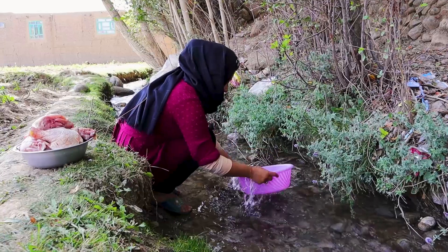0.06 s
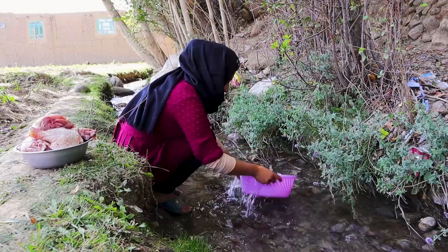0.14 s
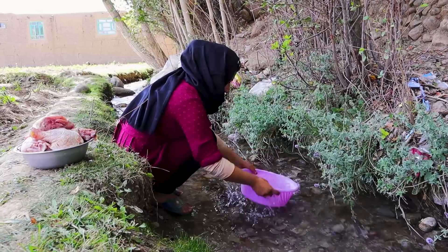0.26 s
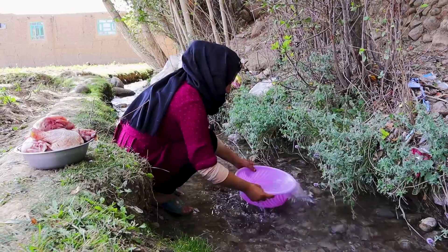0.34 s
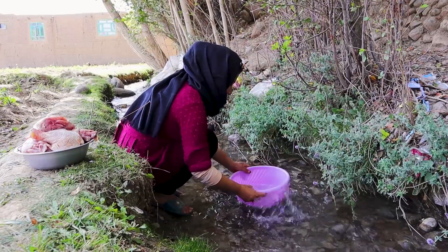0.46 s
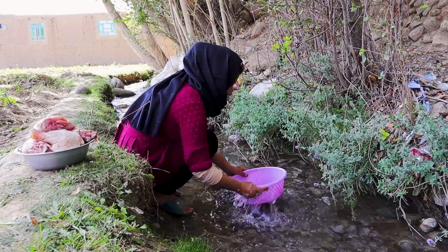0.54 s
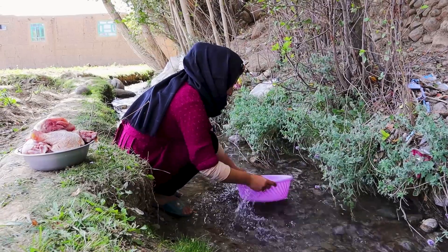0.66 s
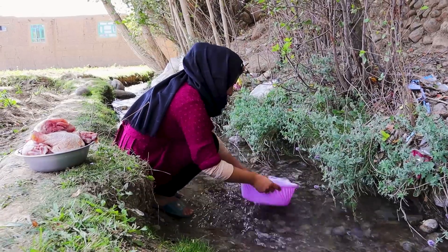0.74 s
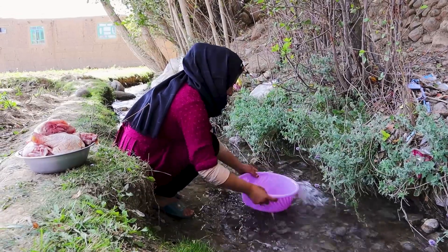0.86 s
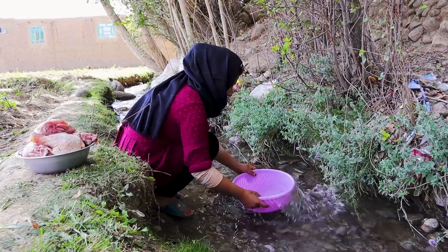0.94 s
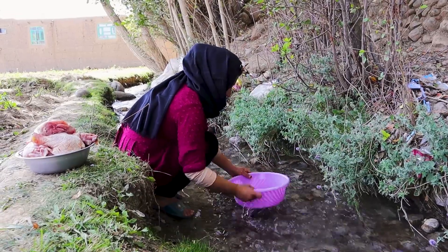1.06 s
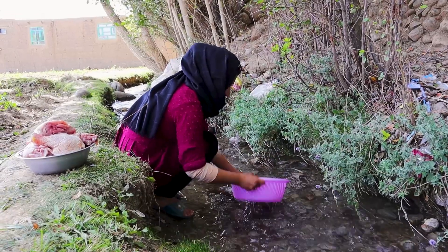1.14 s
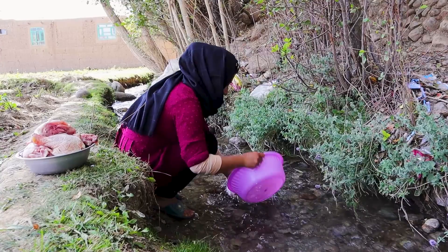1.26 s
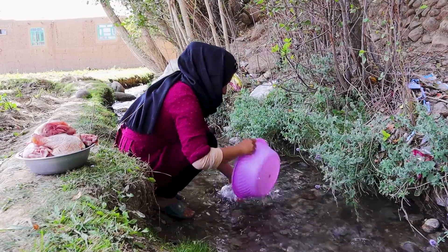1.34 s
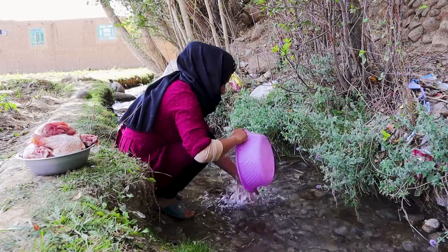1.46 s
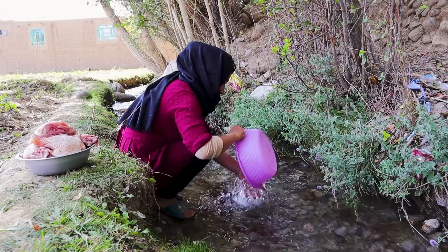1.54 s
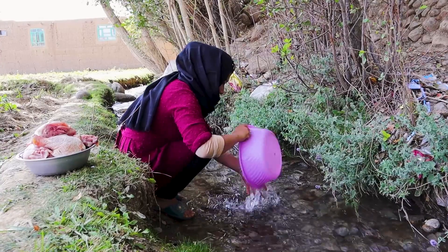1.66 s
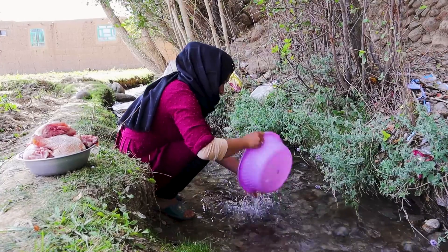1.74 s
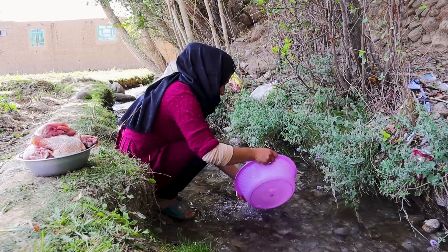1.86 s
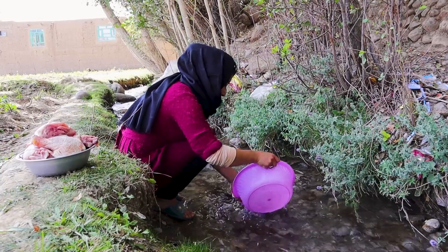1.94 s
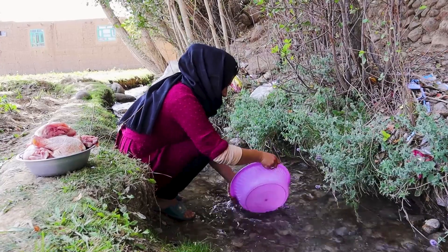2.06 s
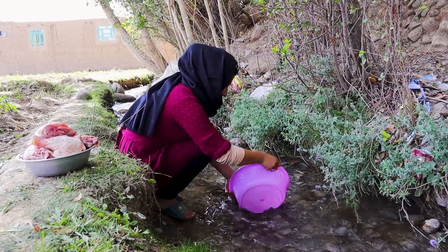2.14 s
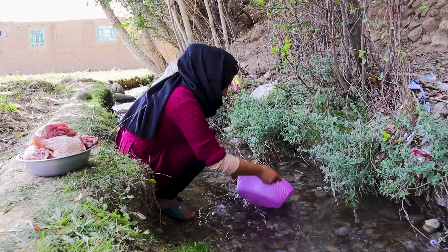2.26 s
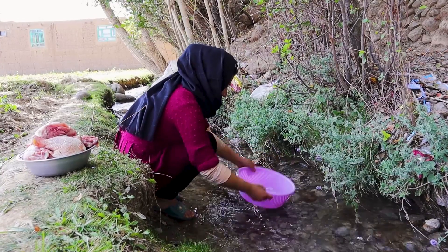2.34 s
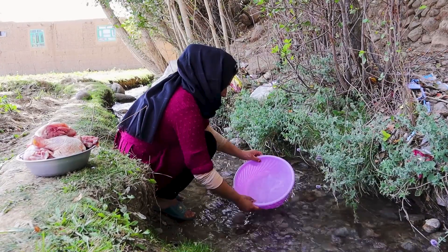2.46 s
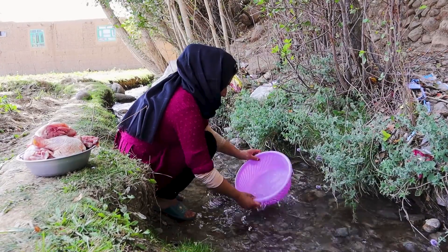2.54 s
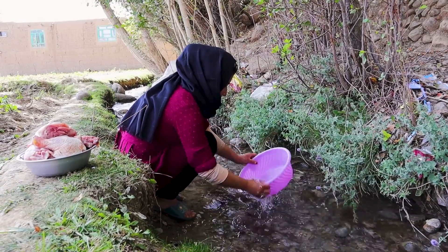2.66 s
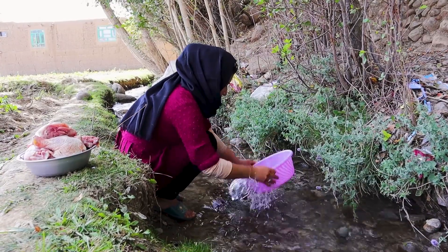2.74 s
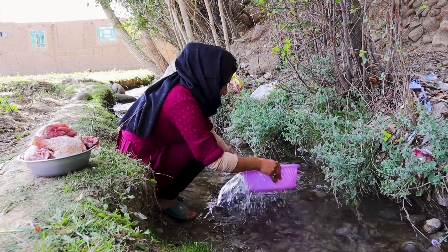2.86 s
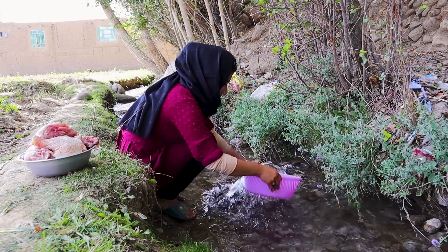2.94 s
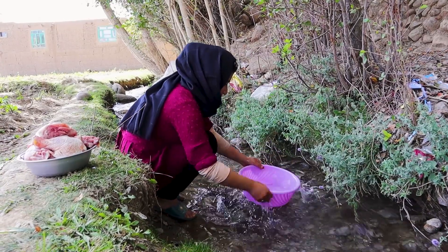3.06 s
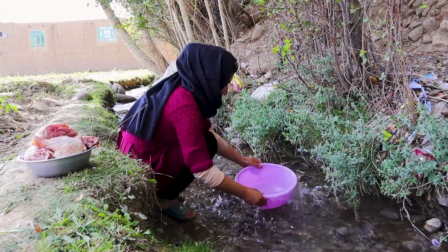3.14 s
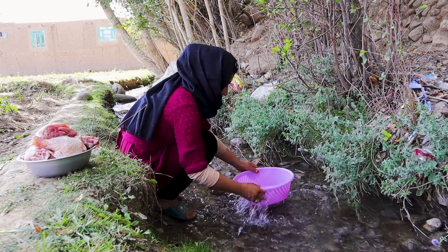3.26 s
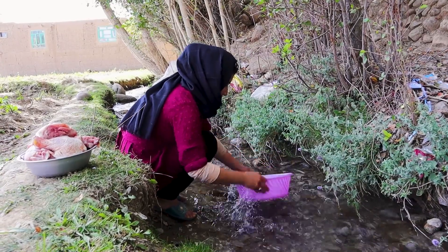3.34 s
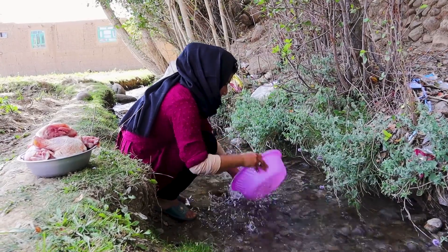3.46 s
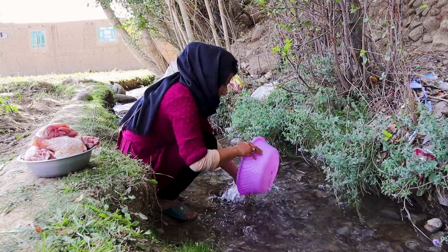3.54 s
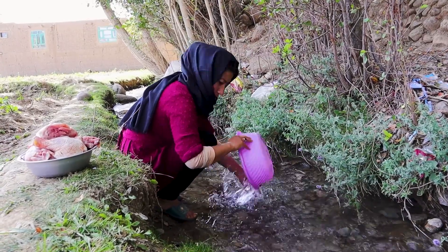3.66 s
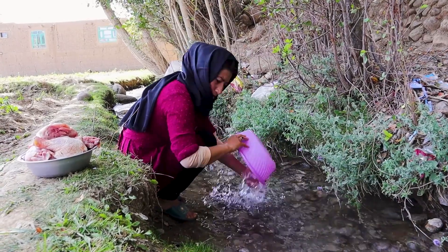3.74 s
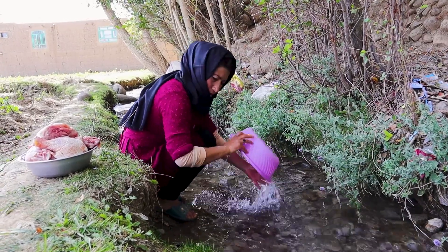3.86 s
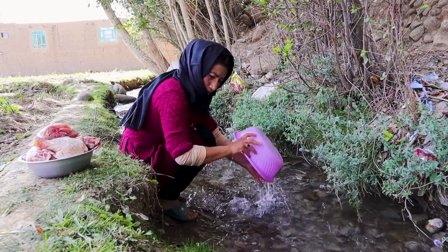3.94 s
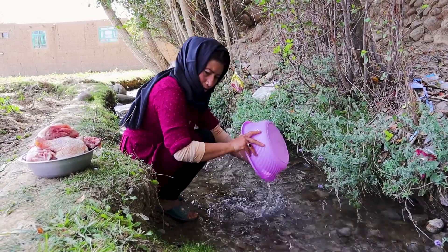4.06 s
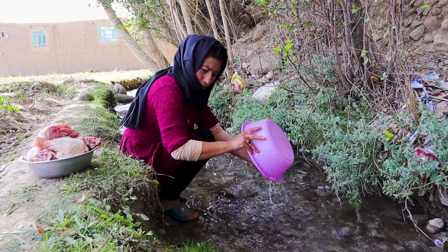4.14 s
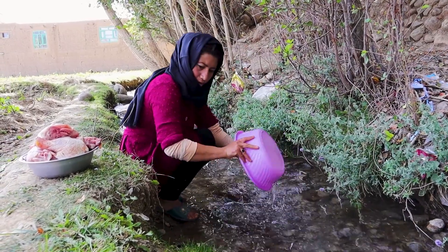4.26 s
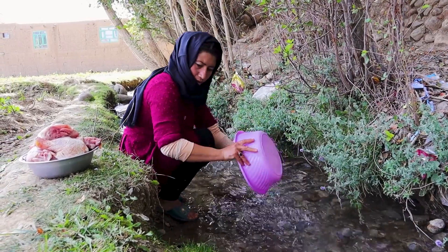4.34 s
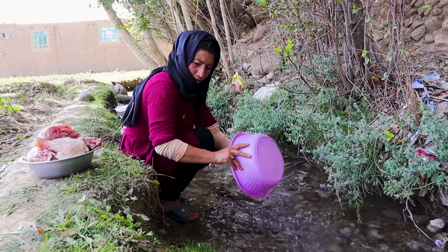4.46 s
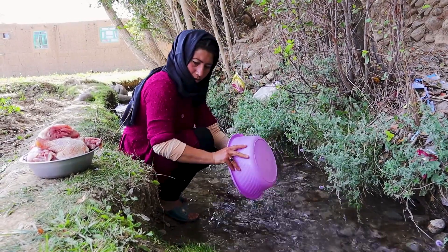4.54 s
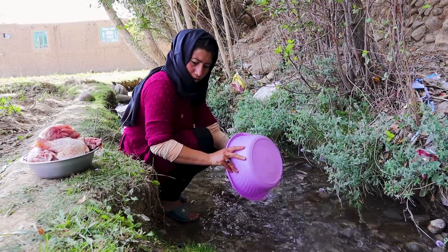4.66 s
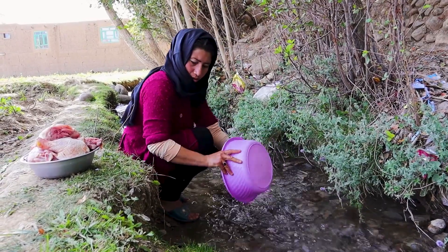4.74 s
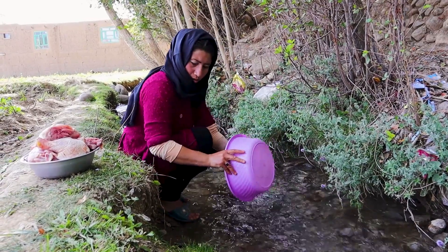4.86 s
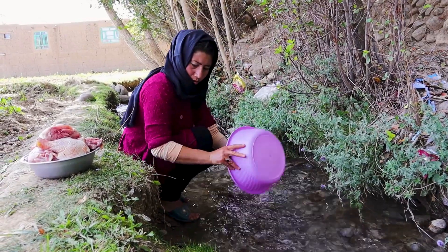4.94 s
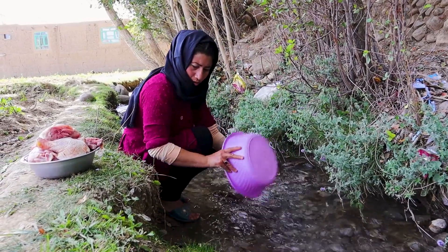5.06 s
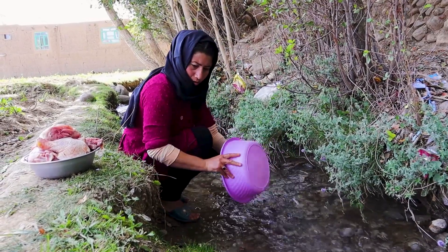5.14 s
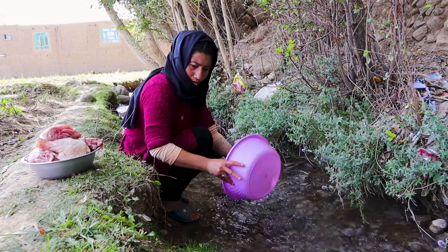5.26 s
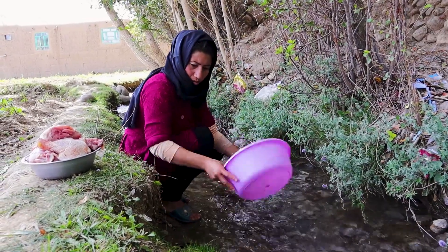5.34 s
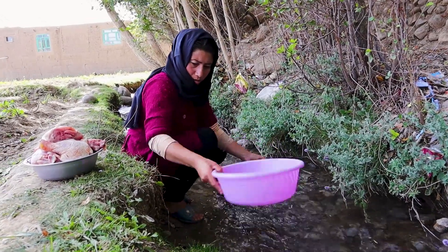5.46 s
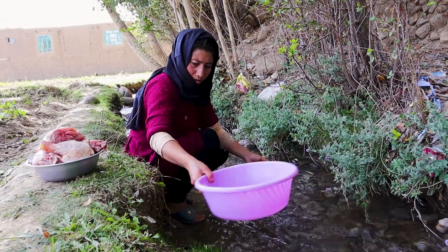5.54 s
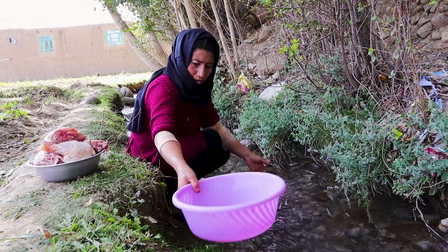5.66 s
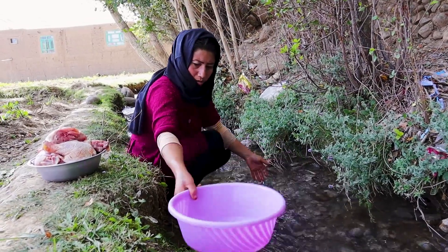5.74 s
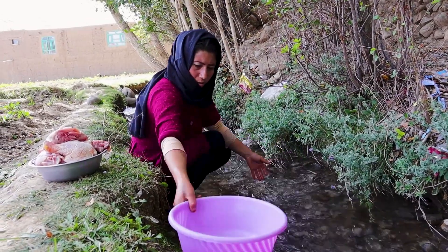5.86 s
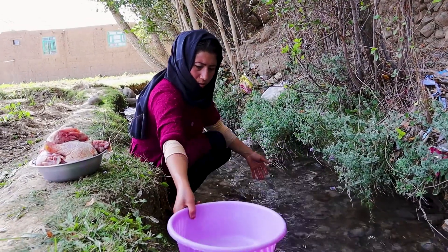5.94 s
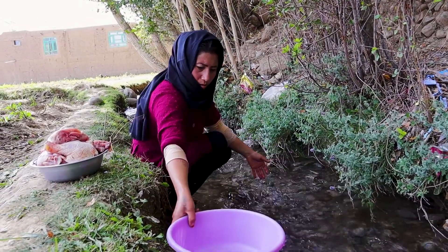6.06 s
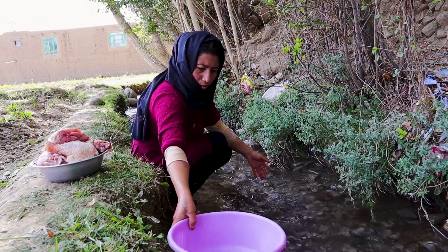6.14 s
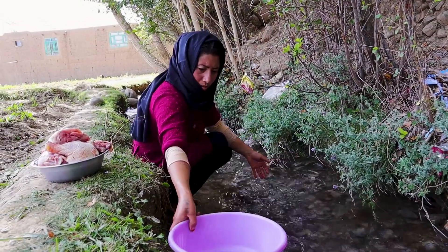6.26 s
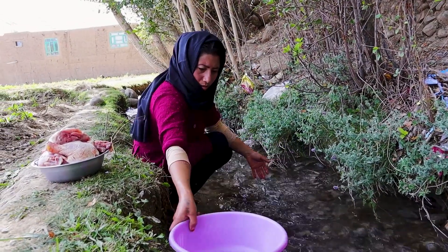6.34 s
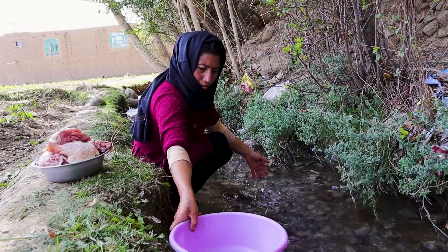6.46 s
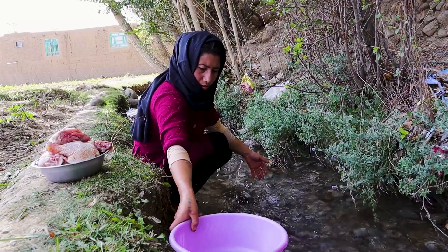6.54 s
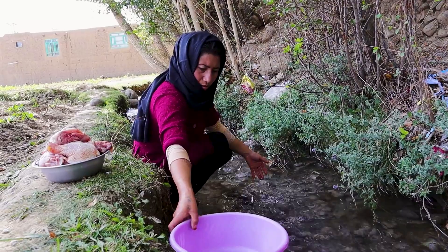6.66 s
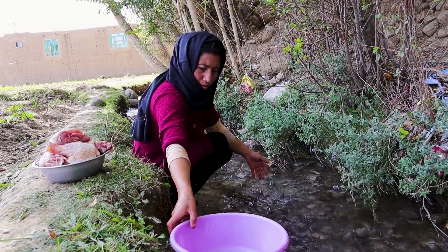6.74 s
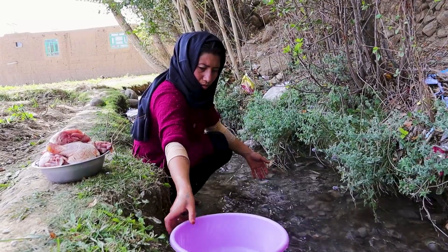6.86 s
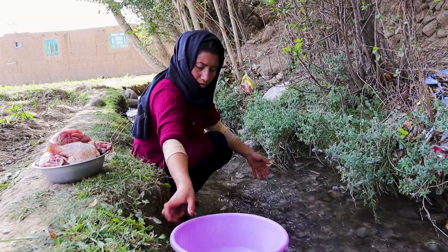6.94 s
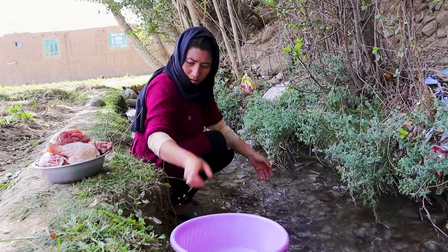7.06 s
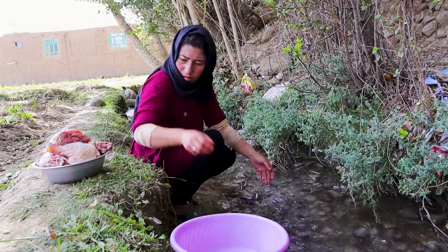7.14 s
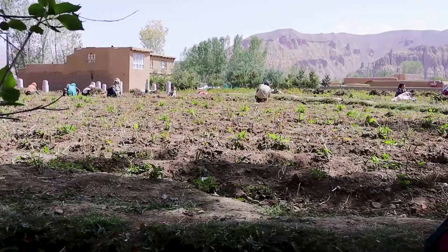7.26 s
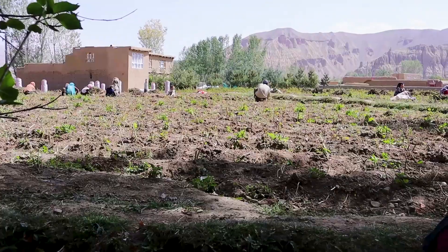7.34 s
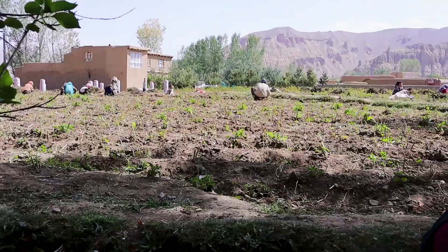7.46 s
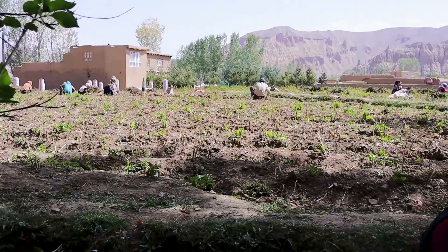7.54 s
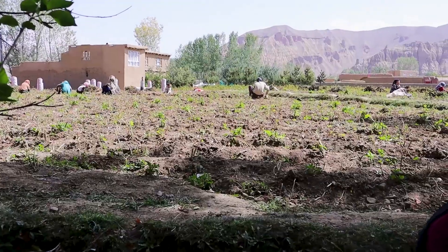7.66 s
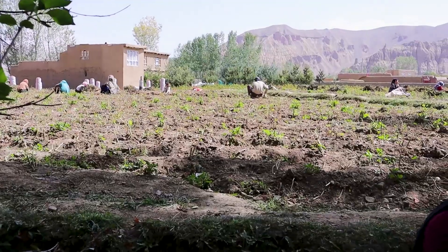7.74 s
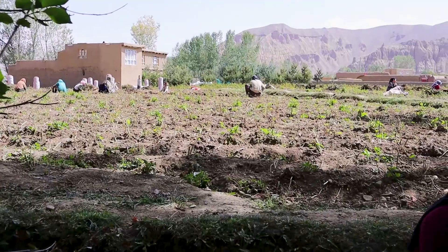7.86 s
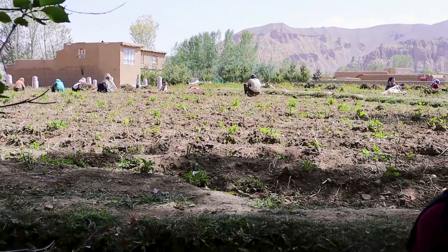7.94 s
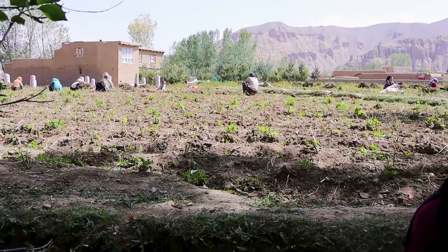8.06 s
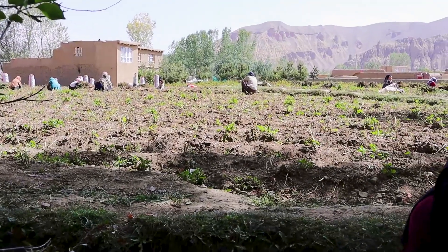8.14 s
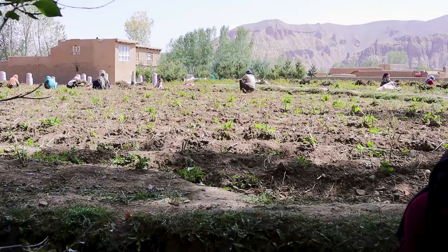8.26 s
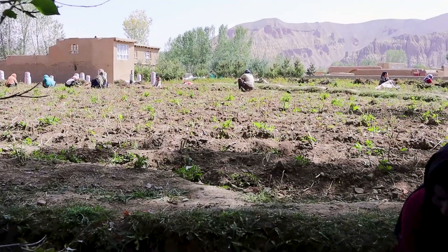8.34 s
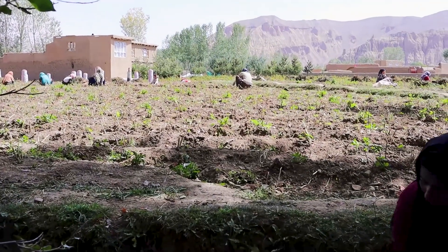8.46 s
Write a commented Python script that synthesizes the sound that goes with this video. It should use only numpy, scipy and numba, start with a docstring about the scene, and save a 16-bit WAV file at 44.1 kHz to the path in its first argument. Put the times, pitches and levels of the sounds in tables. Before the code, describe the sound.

Outdoors at a shallow stream, a plastic basin is rinsed with quick irregular splashes, slaps, gulps and bubbly pours. The water settles to a trickle, and four hollow raps ring the basin, each boomier than the last. Soft handling bumps follow, then after a momentary dip, light hand splashes over a faint distant hum. Close small stereo microphone, very little echo.

```python
"""A plastic basin scoops and pours water in a shallow stream: sheets of spray, gulps, slaps and chains of bubbles.
From 4.4 s four raps ring the basin as a set of damped modes, while the stream trickles on between its stones.
Just after 7.27 s the level dips briefly, then hands splash close by, over a faint, far hum.
Water is a swarm of ringing bubbles with hissing spray; stirred water swells, holds and dies away by one rule.
The scene is outdoors, with a short scattered tail, and is heard through a small two-port microphone."""
import sys
import numpy as np
from scipy import signal
from scipy.fft import rfft, irfft, next_fast_len
from scipy.io import wavfile
from numba import njit

SR = 44100
rng = np.random.default_rng(int(sys.argv[2]) if len(sys.argv) > 2 else 0)


def persist_wave(psi):
    """Save psi, clipped to +-1, as 16-bit WAV."""
    counts = np.round(np.clip(psi, -1, 1) * 32767).astype(np.int16)
    wavfile.write(sys.argv[1], SR, np.atleast_2d(counts).T)


N = 374850
TIME = np.arange(N) / SR
SWELL_FROM_DB = 8   # at its stated start a movement is this far under its full level
SAG_DB_PER_S = 3   # slow loss while stirred water holds
DRIP_BELOW_DB, DRIP_FALL_DB_PER_S = 16, 24.5   # drops keep falling after each movement
CLUSTER_S = 0.008   # time over which one drop sheds its bubbles
GULP_RISE_OCTAVES_PER_S = 4


def from_db(db):
    """Amplitude gain is ten to the power of decibels over twenty."""
    return 10 ** (np.asarray(db) / 20)


def rms_one(x):
    """Normalise to unit mean power."""
    return x / np.sqrt(np.mean(x ** 2) + 1e-20)


def at_hz(points, hz):
    """Interpolate a spectrum on a log-frequency axis, as pitch is heard."""
    f, value = np.transpose(points)
    return np.interp(np.log(hz + 1), np.log(f), value)


def coloured(x, points, share=1):
    """Zero-phase filtering: multiply the spectrum by a smooth gain in dB, scaled by share."""
    size = next_fast_len(N + 4096)   # padding limits wrap-around
    gain = from_db(share * at_hz(points, np.fft.rfftfreq(size, 1 / SR)))
    return irfft(rfft(x, size) * gain, size)[..., :N]


def drift(rate):
    """Low-rate random modulation: straight lines join random knots, rate of them a second; rms 1."""
    knots = rng.standard_normal(int(N / SR * rate) + 2)
    return rms_one(np.interp(TIME * rate, np.arange(len(knots)), knots))


def decay(t, t60):
    """Exponential damping: the amplitude falls 60 dB in t60 seconds."""
    return np.exp(-np.log(1000) * t / t60)


def stereo_noise(width, size):
    """Partial coherence: noise common to both sides plus a part of opposite sign in each."""
    mid, side = rng.standard_normal((2, size))
    return (mid + width * side * np.array([[1], [-1]])) / np.hypot(1, width)


def add(out, s, sound):
    """Superposition: mix a sound in from time s."""
    i = max(int(s * SR), 0)
    out[:, i:i + sound.shape[-1]] += sound[..., :N - i]


def movement(s, swell, hold, fall_db_per_s, sag_db_per_s=0):
    """Envelope in dB, linear in each stage: a swell, a hold with a slight sag, then a fall."""
    t = TIME - s
    swell = max(swell, 0.001)
    rising = SWELL_FROM_DB * np.minimum(t / swell - 1, 0)
    sagging = sag_db_per_s * np.clip(t - swell, 0, hold)
    falling = fall_db_per_s * np.maximum(t - swell - hold, 0)
    return np.maximum(rising - sagging - falling, -200)


def stirred(rows, fall_db_per_s):
    """Gain of stirred water: independent movements add in power, each with a fainter tail of drips."""
    power = 0
    for s, swell, hold, level_db in rows:
        body = movement(s, swell, hold, fall_db_per_s, SAG_DB_PER_S)
        drips = movement(s, swell, hold, DRIP_FALL_DB_PER_S, SAG_DB_PER_S) - DRIP_BELOW_DB
        power = power + from_db(np.maximum(body, drips) + level_db) ** 2
    return np.sqrt(power)


@njit
def ring_bubbles(start, hz, height, t60, glide, pan, turn, size, sr):
    """Bubble resonance: each rings as a dying sine whose pitch climbs as it nears the surface."""
    out = np.zeros((2, size))
    for b in range(len(start)):
        life = t60[b] * sr
        for i in range(min(int(life), size - start[b])):
            age = i / life
            phase = 2 * np.pi * hz[b] / sr * i * (1 + glide[b] * age / 2)
            onset = min(phase / np.pi, 1.0)   # opens over half a cycle
            level = height[b] * np.exp(-np.log(1000) * age) * onset
            out[0, start[b] + i] += level * pan[b] * np.sin(phase + turn[b])
            out[1, start[b] + i] += level / pan[b] * np.sin(phase)
    return out


def bubbles(colour, per_s, low_hz, high_hz, cycles, spread_db, width, glide):
    """Random superposition of bubbles, lower pitches denser per hertz and faint ones commoner; rms 1."""
    when, pitch, big, damping, climb, across, depth = rng.random((int(per_s * N / SR), 7)).T
    # bubbles come in pairs, shed by one falling drop within a few milliseconds
    shared = np.repeat(when[::2], 2)[:len(when)]
    when = np.minimum(shared + rng.random(len(when)) * CLUSTER_S * SR / N, 1)
    hz = (np.sqrt(low_hz) + pitch * (np.sqrt(high_hz) - np.sqrt(low_hz))) ** 2
    # cycles is the mean count in one t60 at 1 kHz
    t60 = cycles * (0.5 + damping) * (hz / 1000) ** 0.25 / hz
    size_db = spread_db * np.minimum(-np.log(1 - big), 3.2)
    # offset the pitch density and the ring length, so that colour sets the spectrum
    height = from_db(at_hz(colour, hz) + size_db) * np.sqrt(np.sqrt(hz) / t60)
    pan = from_db(width * 5.6 * (2 * across - 0.5))   # leans to the left
    turn = width * 1.45 * (2 * depth - 1)   # phase between the sides, radians
    start = (when * N).astype(np.int64)
    swarm = ring_bubbles(start, hz, height, t60, climb * glide, pan, turn, N, SR)
    band = signal.butter(2, [low_hz * 0.7, 12500], "band", fs=SR, output="sos")
    return rms_one(signal.sosfilt(band, swarm))


def spray(colour, crackle_db, width):
    """Modulated noise: countless fine droplets hiss in millisecond spurts; rms 1."""
    spurts = from_db(crackle_db * (drift(700) + 1.16 * drift(90)))
    return rms_one(coloured(stereo_noise(width, N) * spurts, colour))


def patter(per_s, spread_db, t60, low_hz):
    """Random impulses excite decaying noise: stray drops tick brightly on the surface; rms 1."""
    when, big = rng.random((int(per_s * N / SR), 2)).T
    hits = np.zeros(N)
    hits[(when * N).astype(int)] = from_db(spread_db * big)
    dying = signal.lfilter([1], [1, -decay(1 / SR, t60)], hits + 1e-18)
    band = signal.butter(3, [low_hz, 10000], "band", fs=SR, output="sos")
    return rms_one(signal.sosfilt(band, dying * stereo_noise(0.069, N)))


def rinsing():
    """Turbulent mixing: falling sheets give spray and gurgling bubbles; scooping churns deep water."""
    # sheets of water thrown from the basin:
    # (time [s], swell [s], hold [s], spray level [dB], gurgling over spray [dB])
    pour_rows = [(0.0, .025, 0.028, -44.5, 4), (0.088, 0.022, 0.017, -44.5, -14),
                 (.19, 0.0094, .02, -43, -2.5), (0.258, .025, 0.15, -41.5, -0.5), (.45, 0.052, .04, -44, 2),
                 (0.555, 0.068, 0.075, -39.5, -5), (0.791, 0.0086, 0.012, -41, 0.5),
                 (0.982, 0.045, .11, -43.5, -7), (1.367, .13, 0.096, -40.5, -6),
                 (1.552, .02, 0.13, -44, 2.5), (1.666, .02, 0.14, -40, 1.5),
                 (1.843, 0.015, 0.021, -43.5, -1), (2.022, 0.0011, 0.004, -39, -2.5),
                 (2.221, .012, 0.33, -49, 4.5), (2.586, 0.07, 0.15, -50.5, 0.5),
                 (2.924, 0.034, 0.025, -41.5, -5), (2.988, 0.02, 0.11, -40, 0),
                 (3.157, .012, 0.085, -42, -1.5), (3.33, 0.041, 0.086, -44, -4),
                 (3.532, .12, 0.089, -42, 1), (3.781, .012, .02, -40.5, -1),
                 (3.862, 0.028, 0.098, -41.5, -1.5), (4.017, 0.033, 0.072, -49, 2)]
    # the basin digs into the stream: (time [s], swell [s], hold [s], level before a 2 dB lift [dB])
    scoop_rows = [(.265, 0.019, 0.22, -51), (.5, 0.028, 0.3, -52.5), (.803, 0.005, 0.018, -40),
                  (2.018, 0.0025, 0.014, -44.5), (2.22, 0.026, 0.27, -43.5), (2.985, 0.021, 0.013, -47),
                  (3.14, 0.053, 0.021, -55), (3.46, 0.011, 0.34, -60), (4.04, 0.029, 0.012, -56)]
    # spectra: (frequency [Hz], relative density [dB per Hz])
    splash_colour = [(300, -18), (700, -15), (1400, -6), (2500, 2.5), (4000, 5.5), (5300, -3), (7000, 0.5),
                     (8500, -12), (11000, -4.5), (13000, -82), (15500, -34)]
    gurgle_colour = [(300, -8), (500, -11.5), (750, -1), (1000, -5), (1400, 1.5), (2200, -2), (4000, -5),
                     (9000, -49)]
    churn_colour = [(60, -6), (160, -2.5), (255, 0), (370, -11), (560, 8.5), (800, -49), (1500, -40)]
    pour_fall_db_per_s, scoop_fall_db_per_s = 127, 209

    spray_rows = [(s, swell, hold, db) for s, swell, hold, db, _ in pour_rows]
    gurgle_rows = [(s, swell, hold, db + more_db) for s, swell, hold, db, more_db in pour_rows]
    spraying = stirred(spray_rows, pour_fall_db_per_s)
    gurgling = stirred(gurgle_rows, pour_fall_db_per_s)
    churning = stirred(scoop_rows, scoop_fall_db_per_s)

    fizz = bubbles(splash_colour, per_s=1700, low_hz=1239, high_hz=11440, cycles=43,
                   spread_db=4.3, width=0.38, glide=0.57)
    splash = from_db(5.5) * fizz
    splash = splash + from_db(-3.0) * spray(splash_colour, crackle_db=2.5, width=0.92)
    splash = splash + from_db(-8.0) * patter(per_s=90, spread_db=11, t60=0.022, low_hz=2200)

    gurgle = bubbles(gurgle_colour, per_s=620, low_hz=430, high_hz=3190, cycles=51,
                     spread_db=3.5, width=0.43, glide=0.72)
    gurgle_mist = spray(gurgle_colour, crackle_db=-0.5, width=1.0)
    gurgle = from_db(2.0) * gurgle + from_db(-6) * gurgle_mist

    churn = bubbles(churn_colour, per_s=170, low_hz=139.0, high_hz=747, cycles=46,
                    spread_db=4.0, width=0.44, glide=0.051)
    churn_mist = spray(churn_colour, crackle_db=-0.5, width=0.2)
    churn = from_db(-1.5) * churn + from_db(-9.5) * churn_mist

    sloshing = from_db(0.87 * drift(45))
    return sloshing * (spraying * splash + gurgling * gurgle) + from_db(2.0) * churning * churn


def stream():
    """Bubble noise of a trickle over stones, a little to the left: a soft babble under fine plinks."""
    # level of the stream as heard, lower during and after the raps:
    # (time [s], level before the stream's trim [dB])
    level_rows = [(4.36, -50.5), (4.92, -54.5), (5.15, -54), (5.38, -54.5), (5.62, -47), (5.93, -51.5),
                  (6.24, -47), (6.5, -51.5), (7.03, -50), (7.2, -50)]
    # spectrum: (frequency [Hz], relative density [dB per Hz])
    stream_colour = [(200, 10), (400, 2), (800, 5), (1300, 4.5), (2200, -2), (4000, -0.5), (6000, -5),
                     (10500, -9), (13000, -15.5), (15500, -59)]
    trim_db = -0.45
    plinks = bubbles(stream_colour, per_s=720, low_hz=1526, high_hz=11380, cycles=58,
                     spread_db=1.5, width=0.19, glide=0.35)
    babble = bubbles(stream_colour, per_s=350, low_hz=439, high_hz=2356, cycles=61.3,
                     spread_db=2.5, width=1.0, glide=0.89)
    water = from_db(-3.5) * plinks + from_db(-3.5) * babble
    water = water + from_db(-5.0) * spray(stream_colour, crackle_db=2.0, width=1.0)
    water = water + from_db(-19.5) * patter(per_s=7.6, spread_db=32, t60=0.012, low_hz=4000)
    level_s, level_db = np.transpose(level_rows)
    level = from_db(trim_db + np.interp(TIME, level_s, level_db))
    to_the_left = from_db(0.81 * np.array([[1], [-1]]))
    return level * water * to_the_left


def background():
    """Broadband air noise throughout, and a late far hum: a tone of randomly modulated frequency."""
    # spectrum of low outdoor air: (frequency [Hz], relative density [dB per Hz])
    air_colour = [(15, -28), (50, -3.5), (110, 2), (200, -1), (350, -2.5), (800, -33), (3000, -34),
                  (15000, -55)]
    hum_hz, hum_db = 142, -59
    air = rms_one(coloured(stereo_noise(1.0, N), air_colour)) * from_db(2.0 * drift(12.0))
    hum = np.sin(2 * np.pi * np.cumsum(hum_hz * (1 + 0.0048 * drift(7.2))) / SR)
    hum_level_db = hum_db + movement(7.27, swell=0.036, hold=0.71, fall_db_per_s=78)
    return from_db(-59.0) * air + from_db(hum_level_db) * hum


def burst(hz, t60, breadth, width):
    """Impact excitation: fast-dying noise round one broad resonance."""
    t = TIME[:SR // 4]
    edges = np.clip([hz / (1 + breadth), hz * (1 + breadth)], 20, SR * 0.45)
    band = signal.butter(1, edges, "band", fs=SR, output="sos")
    dying = decay(t, t60)
    knock = rms_one(signal.sosfilt(band, stereo_noise(width, len(t))) * dying)
    return knock * np.sqrt(np.mean(dying ** 2))   # longer impacts carry more energy


def impacts(rows, breadth, width):
    """Superposition of bursts, one for each row (time [s], level [dB], centre [Hz], t60 [s])."""
    out = np.zeros((2, N))
    for s, level_db, hz, t60 in rows:
        add(out, s, from_db(level_db) * burst(hz, t60, breadth, width))
    return out


def gulp(hz, ring_cycles):
    """Bubble resonance: a closing air pocket swells in a cycle or two and rings upward, big ones longest."""
    t = TIME[:SR // 6]
    cycles = np.cumsum(hz * 2 ** (GULP_RISE_OCTAVES_PER_S * t)) / SR
    swell = 1 - np.exp(-cycles / 1.58)
    return np.sin(2 * np.pi * cycles) * decay(t, ring_cycles / hz) * swell


def gulps():
    """Single bubble resonances stand out of the water's noise, each opened by the tick of its drop."""
    # deep gulps to the plinks of drops: (time [s], level [dB], starting frequency [Hz])
    gulp_rows = [(.035, -17, 2870), (.058, -18.5, 1690), (.147, -23.5, 2750), (.207, -27, 1670),
                 (.230, -17, 3120), (.350, -26.5, 620), (0.387, -14, 9600), (.400, -28, 934),
                 (.534, -26, 1510), (.546, -26.5, 494), (.623, -17.5, 2560), (.923, -19, 3080),
                 (.924, -25.5, 601), (1.087, -28, 1150), (1.120, -32.5, 704), (1.152, -21, 2450),
                 (1.271, -21, 3860), (1.308, -20, 2090), (1.360, -21, 5000), (1.393, -24.5, 1900),
                 (1.412, -22, 3030), (1.502, -26, 837), (1.562, -22.5, 1186), (1.570, -32, 680),
                 (1.683, -29, 717), (1.820, -24.5, 1130), (2.115, -27, 3200), (2.213, -30, 644),
                 (2.310, -20, 532), (2.339, -23, 4300), (2.356, -19.5, 2260), (2.399, -26.5, 632),
                 (2.433, -20.5, 630), (2.463, -21, 448), (2.480, -20, 583), (2.516, -32.5, 267),
                 (2.580, -32, 520), (2.716, -32.5, 662), (2.742, -24, 2040), (2.775, -25, 1620),
                 (3.053, -31, 775), (3.181, -26, 1190), (3.195, -36, 567), (3.273, -27, 3300),
                 (3.360, -29, 1280), (3.444, -13.5, 2740), (3.638, -11.5, 6500), (3.728, -22.5, 1530),
                 (3.824, -31, 767), (3.960, -16.5, 2090), (4.027, -30, 503), (4.073, -36.5, 410),
                 (4.275, -35, 846), (4.347, -34.5, 1390), (4.484, -33, 2920), (4.504, -29.5, 2300),
                 (4.560, -30, 4200), (4.648, -22.5, 4300), (4.693, -33, 2450), (5.077, -34, 2950),
                 (5.103, -31, 4000), (5.564, -32.5, 3800), (5.846, -40, 2500), (6.060, -32.5, 676),
                 (6.224, -31, 3950), (6.262, -30.5, 735), (6.760, -41, 2400), (6.908, -39.5, 495),
                 (7.169, -39, 3300), (7.294, -32, 3700), (7.321, -36, 2050), (7.407, -31, 614),
                 (7.446, -25, 2020), (7.462, -31, 1440), (7.621, -27, 1940), (7.720, -30.5, 1040),
                 (7.736, -28, 1350), (7.790, -24, 2090), (7.854, -30.5, 2030), (7.880, -35, 820),
                 (7.915, -31.5, 1010), (7.973, -35.5, 623), (8.008, -26.5, 3150), (8.079, -25.5, 4830),
                 (8.120, -29, 4180), (8.141, -33, 3350), (8.191, -32.5, 1110), (8.267, -35.5, 1020),
                 (8.267, -29.5, 3100), (8.335, -31, 826), (8.345, -26, 3060), (8.354, -31, 796),
                 (8.490, -28.5, 2960)]
    tick_db, tick_t60_s = -9.5, 0.0074   # tick level is relative to its bubble, before the low-pass
    out = np.zeros((2, N))
    for s, level_db, hz in gulp_rows:
        add(out, s, from_db(level_db) * gulp(hz, ring_cycles=37))
    tick_rows = [(s, db + tick_db, hz, tick_t60_s) for s, db, hz in gulp_rows]
    ticks = impacts(tick_rows, breadth=0.54, width=0.08)
    return out + signal.sosfilt(signal.butter(3, 10000, fs=SR, output="sos"), ticks)


def slaps():
    """Impact noise of water on water and plastic: a sharp narrow-band crack and a broader splat."""
    # loud slaps and fat drops:
    # (time [s], splat level before a 4 dB cut [dB], centre [Hz], splat t60 [s], opening crack level [dB])
    slap_rows = [(0.284, -23.5, 4500, 0.1, -37), (.297, -22.5, 3300, 0.12, -19),
                 (.503, -19.5, 5600, 0.027, -9.5), (.751, -25, 5600, 0.08, -27),
                 (0.8127, -16.5, 5600, 0.03, -20), (1.001, -20, 6500, 0.039, -23),
                 (1.704, -14.5, 2820, 0.029, -17), (1.787, -19.5, 3000, 0.093, -18),
                 (1.912, -24.5, 3700, 0.025, -14.5), (2.019, -18.5, 2320, 0.12, -24),
                 (2.257, -26.5, 1400, 0.072, -27), (2.309, -26, 785, 0.093, -18.5),
                 (2.453, -23, 400, 0.054, -17), (2.515, -23, 1260, .012, -21),
                 (2.775, -24.5, 3680, 0.035, -35), (3.001, -21, 630, 0.024, -28),
                 (3.183, -24.5, 1280, 0.063, -25), (3.39, -23.5, 7200, 0.028, -24),
                 (3.752, -20.5, 2640, 0.029, -13.5), (3.797, -24, 1390, 0.065, -30),
                 (3.977, -20, 6060, 0.06, -32), (3.988, -15.5, 3200, 0.048, -11),
                 (4.284, -26.5, 2780, 0.016, -25.5), (5.82, -34, 1360, 0.021, -22.5),
                 (5.968, -31, 5030, 0.023, -35), (6.634, -36.5, 10600, 0.062, -24),
                 (6.7045, -24.5, 775, 0.016, -26), (7.443, -32.5, 1660, 0.25, -25),
                 (7.526, -23.5, 990, 0.053, -18.5), (7.7204, -20, 3100, 0.046, -11.5)]
    crack_t60_s = 0.0033
    splats = impacts([row[:-1] for row in slap_rows], breadth=0.57, width=0.18)
    crack_rows = [(s, crack_db, hz, crack_t60_s) for s, _, hz, _, crack_db in slap_rows]
    cracks = impacts(crack_rows, breadth=0.043, width=0.072)
    band = signal.butter(3, [150, 11000], "band", fs=SR, output="sos")
    return signal.sosfilt(band, from_db(-4.0) * splats + cracks)


def gurgles():
    """Repeated bubble shedding: a hollow in the water gives an uneven chain, each pitch set by its size."""
    # chains of bubbles: (time [s], length [s], level [dB], first pitch [Hz], last pitch [Hz])
    chain_rows = [(0.284, 0.064, -34.5, 483, 600), (0.339, .09, -35, 597, 734),
                  (0.356, 0.13, -29.5, 1190, 1750), (1.461, 0.066, -35, 784, 760),
                  (1.606, 0.11, -28, 760, 770), (1.702, .13, -40, 565, 440),
                  (2.222, 0.041, -32.5, 640, 880), (2.232, 0.074, -41, 217, 263),
                  (2.337, 0.078, -34, 234, 280), (2.3, 0.18, -33.5, 940, 1400),
                  (2.411, 0.094, -31.5, 480, 637), (2.419, 0.083, -39.5, 258, 181),
                  (3.015, 0.096, -36, 730, 860), (3.02, 0.2, -41.5, 430, 517),
                  (3.927, .04, -36.5, 515, 447), (5.567, 0.15, -44.5, 680, 840),
                  (6.099, 0.087, -40, 615, 820), (6.901, 0.16, -43.5, 683, 820),
                  (7.374, 0.11, -33.5, 1100, 840), (7.741, 0.042, -28, 1170, 2210)]
    gap_s, scatter_octaves = 0.014, 0.18
    out = np.zeros((2, N))
    for s, length, level_db, first_hz, last_hz in chain_rows:
        chance = rng.uniform(-1, 1, (32, 2))
        for age, (late, size) in zip(np.arange(0, length, gap_s), chance):
            hz = first_hz * (last_hz / first_hz) ** (age / length) * 2 ** (scatter_octaves * size)
            bubble = gulp(hz, ring_cycles=27.4)
            add(out, s + age + late * gap_s / 2, from_db(level_db) * bubble)
    return out


def handling():
    """Damped bumps as the basin is shifted and set down; friction of fingers excites its wall resonance."""
    # bumps of the basin on the bank: (time [s], level before the low-pass [dB], centre [Hz], t60 [s])
    bump_rows = [(.82, -46.5, 147, 0.49), (.975, -52.5, 134, 0.8), (2.145, -43, 130, 0.071),
                 (5.475, -42.5, 110, 0.059), (5.915, -51, 63.7, 0.31), (6.262, -37, 86, 0.084),
                 (7.185, -46.5, 79, 0.089)]
    rub_hz, rub_db = 298, -58
    low = signal.butter(2, 400, fs=SR, output="sos")
    bumps = signal.sosfilt(low, impacts(bump_rows, breadth=0.28, width=0.3))
    wall = signal.butter(1, [rub_hz - 15, rub_hz + 15], "band", fs=SR, output="sos")
    rub = rms_one(signal.sosfilt(wall, rng.standard_normal(N)))
    sliding_db = rub_db + movement(5.42, swell=0.12, hold=0.79, fall_db_per_s=128, sag_db_per_s=4.5)
    return bumps + from_db(sliding_db) * rub


def raps():
    """Modal synthesis: a tick and palm pat open each rap, then the basin's slower modes build to a boom."""
    # raps: (time [s], boom [dB], wall modes [dB], upper modes [dB], tick [dB],
    # upper-mode tuning [ratio], lowest-thump tuning [ratio], ring length [ratio], opening pitch bend [share])
    rap_rows = [(4.3994, -18.5, -21.5, -16.5, -37, 0.91, 1.36, 1.17, 0.051),
                (4.6239, -12, -17.5, -19.5, -29, 0.97, 1.21, 1.16, .029),
                (4.832, -9.5, -10, -6, -26, 0.93, 1.08, .96, 0.092),
                (5.215, -5, -5.5, -6, -19.5, 0.92, 1.14, 1.07, 0.074)]
    # basin modes, before each rap's ratios:
    # (frequency [Hz], relative level [dB], t60 [s], build-up time constant [s])
    mode_rows = [(99.5, -0.4, 0.047, 0.011), (210.6, -4, 0.1, 0.02), (225, 5, 0.085, 0.018),
                 (237.6, 3.5, 0.11, 0.011), (290.4, -14.5, 0.19, 0.014), (311, -4.5, 0.084, 0.0018),
                 (327.5, -16.5, 0.16, 0.016), (463, -31.5, 0.1, 0.00057), (528, -14, 0.057, 0.00042),
                 (553, -20.5, 0.08, 0.0014), (614, -19, 0.093, 0.0015), (767, -26.5, .06, 0.0023),
                 (892, -22.5, 0.059, 0.000087), (1380, -21.5, 0.037, 0.0039), (1530, -26, 0.017, 0.00018),
                 (1840, -18, 0.027, 0.0026)]
    palm_db = -17.5   # pat of the palm relative to the wall modes, before the low-pass
    pat_low = signal.butter(3, 700, fs=SR, output="sos")
    tick_low = signal.butter(6, 8000, fs=SR, output="sos")
    out, t = np.zeros((2, N)), TIME[:SR // 3]
    for s, boom_db, wall_db, upper_db, tick_db, grip, press, ring, bend in rap_rows:
        # the base is stiffer while it is bent, so the pitch starts high and settles
        stiffening = 1 + bend * decay(t, t60=0.047)
        for hz, mode_db, t60, build in mode_rows:
            blow_db = upper_db if hz > 380 else wall_db if hz > 270 else boom_db
            tuning = grip if hz > 380 else press if hz < 150 else 1
            swell = 1 - np.exp(-(t / build) ** 3)
            swing = -np.sin(2 * np.pi * np.cumsum(hz * tuning * stiffening) / SR)
            add(out, s, from_db(blow_db + mode_db) * swell * decay(t, t60 * ring) * swing)
        pat = signal.sosfilt(pat_low, burst(hz=380, t60=0.069, breadth=0.47, width=0.1))
        add(out, s, from_db(wall_db + palm_db) * pat)
        tick = burst(hz=3900, t60=0.021, breadth=1.0, width=0.32)
        tick = tick + from_db(-11.0) * burst(hz=6500, t60=0.017, breadth=0.026, width=0.97)
        add(out, s, from_db(tick_db) * signal.sosfilt(tick_low, tick))
    return out


def hands():
    """Sparse bubble resonance: hands stir close by, with plinks, rising plops, a little spray and drips."""
    # strokes of the hands in the water: (time [s], swell [s], hold [s], level [dB])
    stroke_rows = [(7.293, .001, 0.046, -47), (7.365, 0.016, .07, -49), (7.523, 0.011, 0.014, -41),
                   (7.605, 0.0069, 0.0084, -42.5), (7.675, .02, .02, -45.5), (7.735, 0.018, 0.017, -38),
                   (7.92, .015, .02, -48.5), (8.31, 0.053, .036, -53.5)]
    # spectrum: (frequency [Hz], relative density [dB per Hz])
    hands_colour = [(200, -29), (400, -8), (700, -13), (1200, -11.5), (2000, -8), (3300, -6.5), (5000, -6),
                    (8000, -12.5), (10500, -7.5), (13000, -20), (15500, -35)]
    start_s, fall_db_per_s, drip_db = 7.293, 154, -55.5
    drops = bubbles(hands_colour, per_s=540, low_hz=1545, high_hz=11870, cycles=68,
                    spread_db=5.0, width=0.33, glide=0.65)
    chirps = bubbles(hands_colour, per_s=190, low_hz=643, high_hz=2770, cycles=46,
                     spread_db=4.0, width=0.58, glide=0.53)
    water = from_db(0.5) * drops + from_db(-3.0) * chirps
    water = water + from_db(-2.8) * spray(hands_colour, crackle_db=2.8, width=0.58)
    water = water + from_db(-9.0) * patter(per_s=25, spread_db=8, t60=0.022, low_hz=2200)
    # a steady drip adds in power to the strokes
    stirring = np.hypot(stirred(stroke_rows, fall_db_per_s), from_db(drip_db))
    return (TIME > start_s) * stirring * water


def banks(x, t60, wet_db):
    """Diffuse reflection as convolution: banks and bushes scatter back a short, dull tail."""
    t = TIME[:SR // 2]
    treble_cut = signal.butter(1, 3500, fs=SR, output="sos")
    bass_cut = signal.butter(1, 500, "high", fs=SR, output="sos")
    tail = signal.sosfilt(treble_cut, rng.standard_normal((2, len(t))))
    tail = signal.sosfilt(bass_cut, tail) * decay(t, t60) * (t > 0.006)
    tail = tail / np.sqrt(np.sum(tail ** 2) / 2)
    return x + from_db(wet_db) * signal.fftconvolve(x, tail, axes=1)[:, :N]


def scene():
    """Superposition of all sources outdoors; the level dips for an instant before the hands splash."""
    # the brief dip: (start [s], end [s])
    dip_s = (7.272, 7.293)
    water = rinsing() + stream() + gulps() + slaps() + gurgles() + hands()
    near = banks(water + handling() + raps(), t60=0.052, wet_db=-19.5)
    dip = (TIME > dip_s[0]) & (TIME < dip_s[1])
    return near * from_db(-13 * dip) + background() * from_db(-5 * dip)


def record(dry):
    """Two-port pickup: an all-pass lags the left up to half a cycle in the treble; the bass is shared."""
    # level between the ports: (frequency [Hz], left minus right [dB])
    port_balance = [(100, 1), (380, -0.5), (700, -5), (1300, -8), (2400, -5.5), (4400, -3), (8000, -3),
                    (15000, -4.5)]
    # gain of the difference between the ports: (frequency [Hz], gain [dB])
    port_width = [(100, -16), (180, -14), (260, -3), (500, -2.5), (1200, -1), (3000, -1), (8000, 1)]
    turn_hz = 1500   # the left lags a quarter cycle here
    k = np.tan(np.pi * turn_hz / SR)
    pole = (1 - k) / (1 + k)
    left = signal.lfilter([-pole, 1], [1, -pole], coloured(dry[0], port_balance, share=1 / 2))
    right = coloured(dry[1], port_balance, share=-1 / 2)
    mid = (left + right) / 2
    side = coloured((left - right) / 2, port_width)
    top_cut = signal.cheby2(18, 50, 16300, fs=SR, output="sos")   # 50 dB down from 16.3 kHz
    return signal.sosfilt(top_cut, np.array([mid + side, mid - side]))


dry = scene()
out = record(dry)
persist_wave(out)
```